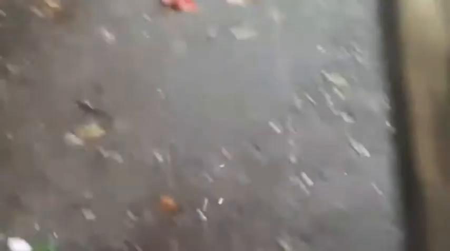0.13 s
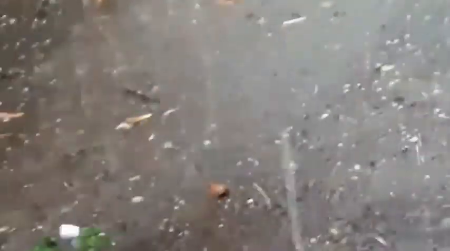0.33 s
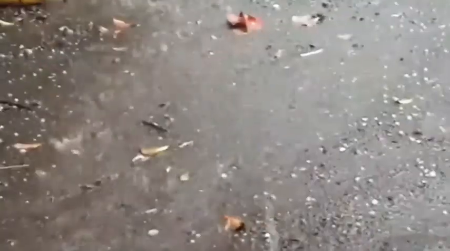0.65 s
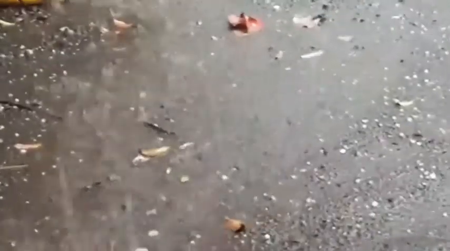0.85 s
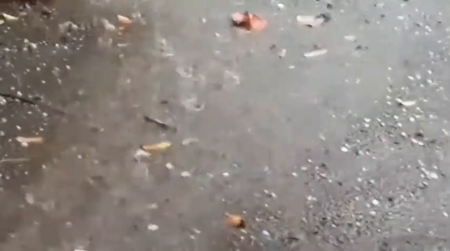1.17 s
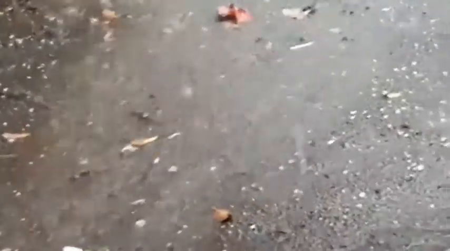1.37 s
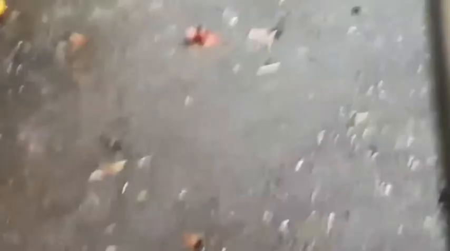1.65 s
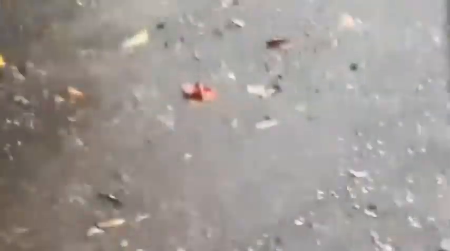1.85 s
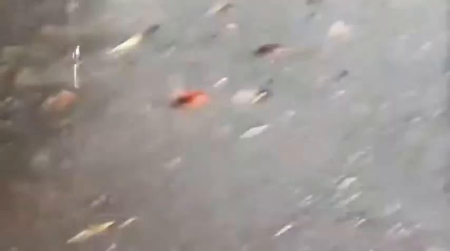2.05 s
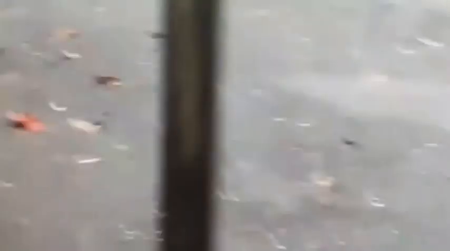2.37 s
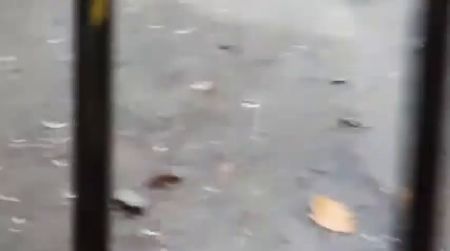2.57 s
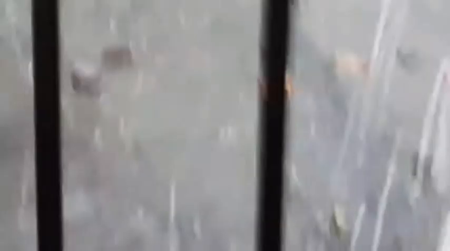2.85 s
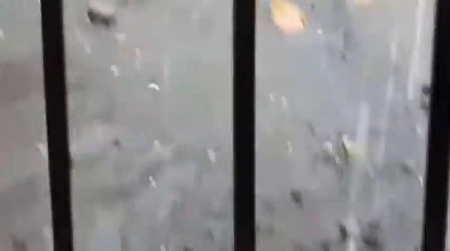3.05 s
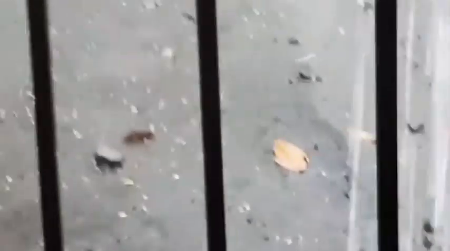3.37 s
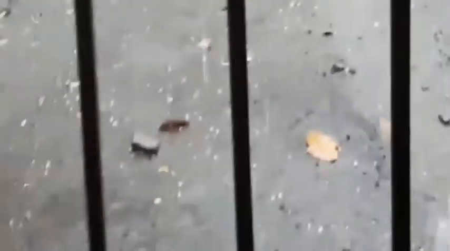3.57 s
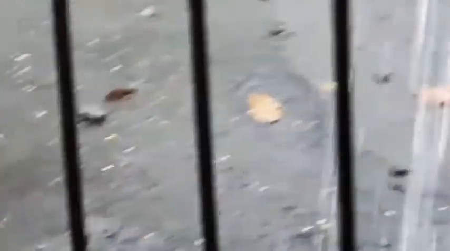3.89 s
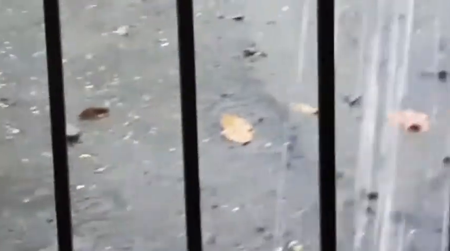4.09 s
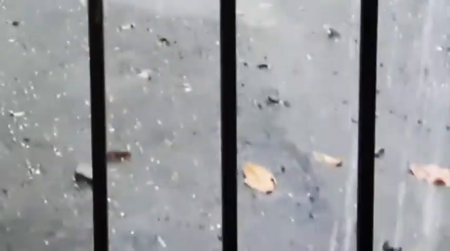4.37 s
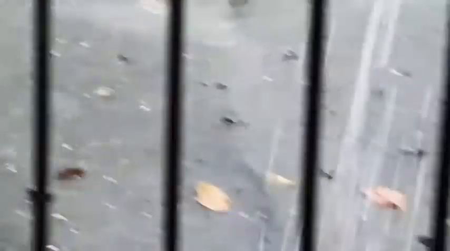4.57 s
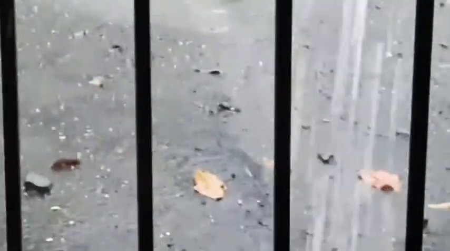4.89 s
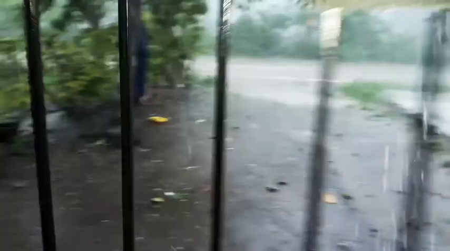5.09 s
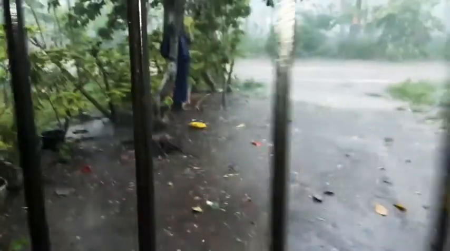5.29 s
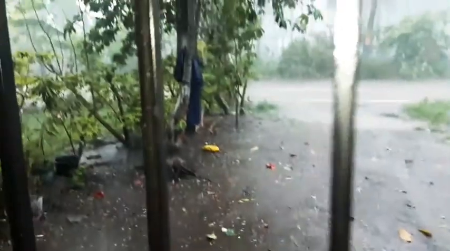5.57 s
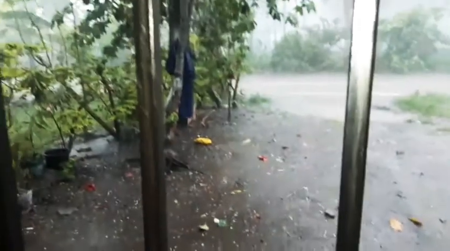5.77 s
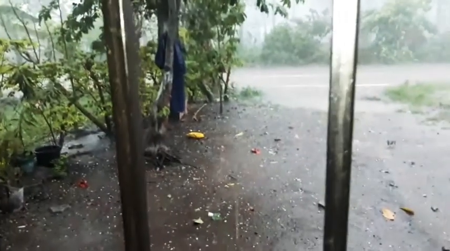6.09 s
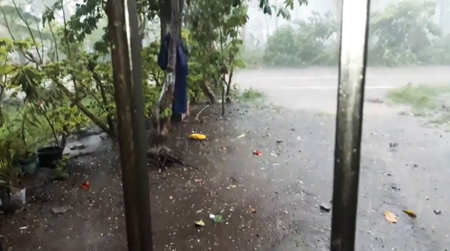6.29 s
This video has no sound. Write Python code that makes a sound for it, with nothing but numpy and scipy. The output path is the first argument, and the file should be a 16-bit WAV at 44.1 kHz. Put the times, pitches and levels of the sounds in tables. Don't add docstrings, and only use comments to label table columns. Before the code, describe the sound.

Continuous heavy rain with fine nearby grains fills an open yard, with no quiet lead-in. Runoff from the roof edge splatters irregularly, and hail and water clumps smack the slab often during the first five seconds. A very brief gap near 5.1 seconds marks a change, after which the rain is louder, more even, with few slaps. Close, dry mono pickup from a small microphone under the porch.

```python
import sys
import numpy as np
from scipy import signal
from scipy.io import wavfile
from scipy.ndimage import uniform_filter1d

SR = 44100
rng = np.random.default_rng(int(sys.argv[2]) if len(sys.argv) > 2 else 0)


def voltage_ratio(level):
    return 10 ** (np.asarray(level, float) / 20)


def dump(signal):
    limited = np.clip(np.atleast_2d(signal).T, -1, 1)
    pcm = np.round(limited * 32767).astype(np.int16)
    wavfile.write(sys.argv[1], SR, pcm)


N = 284004


def rms_one(x):
    return x / np.sqrt(np.mean(x ** 2) + 1e-20)


def in_time(rows):
    return np.interp(np.arange(N) / SR, *np.transpose(rows))


def drift(rate_hz):
    step, settle = 40, 2000
    pole = np.exp(-2 * np.pi * rate_hz * step / SR)
    noise = rng.standard_normal(N // step + settle + 2)
    slow = signal.lfilter([1], [1, -2 * pole, pole * pole], noise)[settle:]
    return np.interp(np.arange(N) / step, np.arange(len(slow)), rms_one(slow))


def band_pass(x, low_hz, high_hz):
    edges_hz = [low_hz, min(high_hz, .45 * SR)]
    return signal.sosfilt(signal.butter(2, edges_hz, "band", fs=SR, output="sos"), x)


def drops(per_s, spread_db):
    size_db = spread_db * np.minimum(rng.exponential(1, N), 5)
    impacts = voltage_ratio(size_db) * rng.choice([-1, 1], N)
    return rms_one(impacts * (rng.random(N) < per_s / SR))


def curtain_swell_db():
    # start in seconds, swell in dB, length in seconds.
    shed = [(0, 15, 0.0067), (0.08, 5.5, 0.012), (0.291, 5, 0.17), (0.44, 2, 0.02), (0.54, 5.5, 0.15),
            (0.777, 2.5, 0.026), (0.95, 3, 0.038), (1.082, 4, 0.035), (1.181, 5.5, 0.037),
            (1.378, 2, 0.081), (1.591, 6, 0.07), (1.679, 6, 0.026), (1.742, 4.5, 0.13), (1.913, 4.5, 0.053),
            (2.045, 4.5, 0.16), (2.16, 5.5, 0.04), (2.253, 2.5, 0.062), (2.384, 3, 0.049),
            (2.444, 6.5, 0.027), (2.572, 5, 0.037), (2.685, 4.5, 0.042), (2.78, 4.5, 0.12),
            (2.888, 6.5, 0.031), (2.956, 4.1, 0.13), (3.34, 2, 0.047), (3.405, 4.7, 0.087),
            (3.932, 3, 0.29), (4.276, 3, 0.059), (4.77, 0, 0.16), (4.917, 2.5, 0.054)]
    rise_s = 0.0081
    gain = np.ones(N)
    t = np.arange(SR // 2) / SR
    shape_rise = 1 - np.exp(-t / rise_s)
    for start_s, swell_db, length_s in shed:
        part = gain[int(max(start_s, 0) * SR):][:len(t)]
        part += (voltage_ratio(swell_db) - 1) * shape_rise * np.exp(-(t / length_s) ** 2)
    return 20 * np.log10(gain)


def rain(near_db, surge_db, patchy_db):
    # time in seconds, splash level in dB.
    runoff = [(0.0, -15.5), (0.5, -17), (1.0, -14), (1.5, -17.5), (2.0, -18.0), (2.4, -15.5), (2.8, -20.5),
              (3.2, -20), (3.6, -19), (3.85, -15.5), (4.1, -15.5), (4.5, -15.5), (4.8, -15), (5.09, -15.5),
              (5.14, -11.4), (5.5, -12), (6.0, -12), (6.44, -12.5)]
    # time in seconds, gain toward the wet slab in dB.
    heading = [(0, 3), (.2, 4.5), (.35, 0.5), (1, 0), (1.8, 0), (2.4, -1), (3.2, 2.5), (3.7, 3.5),
               (4.1, 0.5), (4.5, 4), (4.7, 1), (5.09, 3), (5.14, 2), (5.3, -0.5), (5.5, -2), (6.44, -2.5)]
    # frequency in Hz, density in dB per Hz.
    downpour = [(24, -64), (40, -37), (159, -7.5), (286, -7), (395, -4.5), (491, -7), (756, -5.5),
                (1000, -2.5), (1480, -3), (1960, 1.5), (3510, -3), (4540, -6.5), (7000, -13.5), (9100, -79),
                (15400, -120)]
    # frequency in Hz, density in dB per Hz.
    spray = [(6000, -12), (9000, -19.5), (12200, -13), (14900, -14), (16500, -30)]
    layer_hz = (300, 1000, 2500, 12000)
    per_runoff = (1, 1.18, 1.11, 0.96)
    per_heading = (1.3, 0.48, 0.0089, 0.8)
    per_clump = (0.92, 0.97, 0.98, 0.66)

    splash_db = in_time(runoff)
    layers_db = np.outer(per_runoff, splash_db - splash_db.mean())
    layers_db += np.outer(per_heading, in_time(heading))
    layers_db += np.outer(per_clump, curtain_swell_db())
    layers_db -= layers_db.mean(axis=1, keepdims=True)

    sources = []
    for _ in range(2):
        hiss = rng.standard_normal(N)
        sources.append(hiss + voltage_ratio(near_db) * drops(per_s=5000, spread_db=3.5))
    surge = surge_db * drift(22.5)
    colour = np.array(list(downpour[:-1]) + list(spray[1:]))
    edges_hz = 35 * 2 ** np.arange(0, 9.1, 1 / 3)
    out = np.zeros(N)
    for k, (low_hz, high_hz) in enumerate(zip(edges_hz, edges_hz[1:])):
        log_hz = np.log(np.sqrt(low_hz * high_hz))
        place = np.interp(log_hz, np.log(layer_hz), range(4))
        share = np.maximum(1 - np.abs(place - np.arange(4)), 0)
        level_db = np.interp(log_hz, np.log(colour[:, 0]), colour[:, 1]) + share @ layers_db
        level_db += min(place, 1) * surge + patchy_db * drift(12.2)
        out += voltage_ratio(level_db) * band_pass(sources[k % 2], low_hz, high_hz)
    return voltage_ratio(splash_db.mean() + 4) * rms_one(out)


def slaps(spray_t60_s, body_t60_s):
    # time in seconds, peak in dB, body relative to peak in dB.
    landings = [(0.4374, -23, -9), (0.5097, -19, -6), (0.5521, -15, 3), (0.599, -12, -15),
                (0.6494, -12, -6), (0.771, -8, -0.5), (0.9408, -27, -13), (1.276, -21, -18),
                (1.3758, -13, -5), (1.5219, -22, -6), (1.6003, -19, -10), (1.8287, -20, 1),
                (1.9066, -11, -0.5), (2.257, -12, -8), (2.39, -7, -10), (2.534, -12, -4), (2.579, -13, -10),
                (2.983, -10.5, -4), (3.1837, -20.5, 5), (3.4226, -35, -14.5), (3.4431, -31, -18),
                (3.5708, -10.5, -10), (3.8591, -20, 0.5), (3.9265, -10.5, -2), (4.1315, -14, -42),
                (4.7162, -17.5, -20), (4.8264, -12, -6), (4.9372, -10, -6), (5.7139, -17.5, 5),
                (5.7947, -34, -22)]
    start_s, peak_db, body_db = np.transpose(landings)
    at = np.round(start_s * SR).astype(int)
    parts = ((-7, spray_t60_s, 6000, 16000), (body_db, body_t60_s, 900, 5500))
    out = np.zeros(N)
    for gain_db, t60_s, low_hz, high_hz in parts:
        kicks = np.zeros(N) + 1e-18
        kicks[at] = voltage_ratio(peak_db + gain_db)
        fade = signal.lfilter([1], [1, -voltage_ratio(-60 / (t60_s * SR))], kicks)
        fade = uniform_filter1d(fade, size=SR // 100)
        droplets = drops(per_s=7500, spread_db=1.5)
        out += fade * rms_one(band_pass(droplets, low_hz, high_hz))
    return out


def scene():
    wet = rain(near_db=-0.5, surge_db=0.89, patchy_db=1.0)
    wet = wet + slaps(spray_t60_s=0.12, body_t60_s=0.12)
    return wet[None]


def port_dip(x):
    dip = (8150, 4600, -16)
    hz, width_hz, gain_db = dip
    a = voltage_ratio(gain_db / 2)
    k = np.tan(np.pi * width_hz * a / SR)
    middle = -2 * np.cos(2 * np.pi * hz / SR)
    return signal.lfilter([1 + k * a, middle, 1 - k * a], [1 + k / a, middle, 1 - k / a], x)


def drop_out(x):
    silence = (5.0883, 5.1427)
    start_s, end_s = silence
    t = np.arange(N) / SR
    tail = voltage_ratio(-52 - 4900 * np.maximum(t - start_s, 0))
    return x * np.where((t > start_s) & (t < end_s), tail, 1)


def low_pass(x):
    return signal.sosfilt(signal.butter(12, 15740, fs=SR, output="sos"), x)


def record(dry):
    x = port_dip(dry)
    x = np.clip(1.53 * np.tanh(x / 1.51), -1, 1)
    x = drop_out(x)
    x = signal.sosfilt(signal.ellip(10, .5, 50, 15750, fs=SR, output="sos"), x)
    return low_pass(x)


dry = scene()
out = record(dry)
dump(out)
```